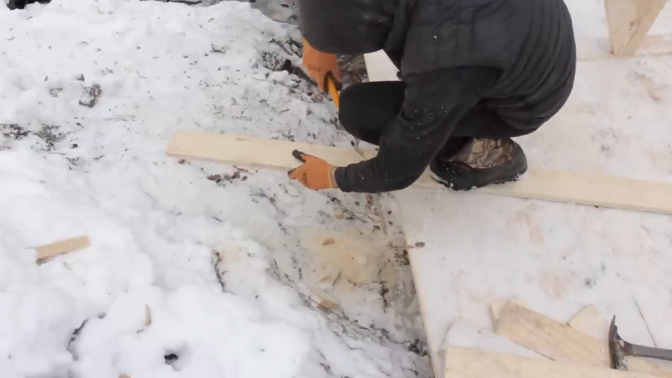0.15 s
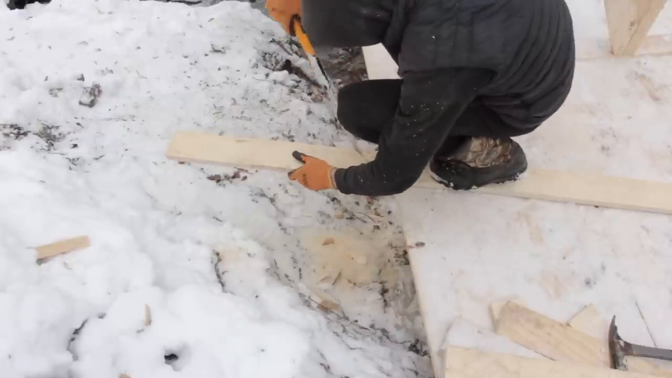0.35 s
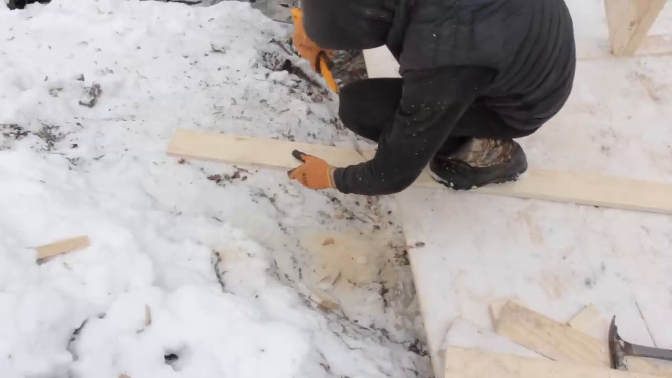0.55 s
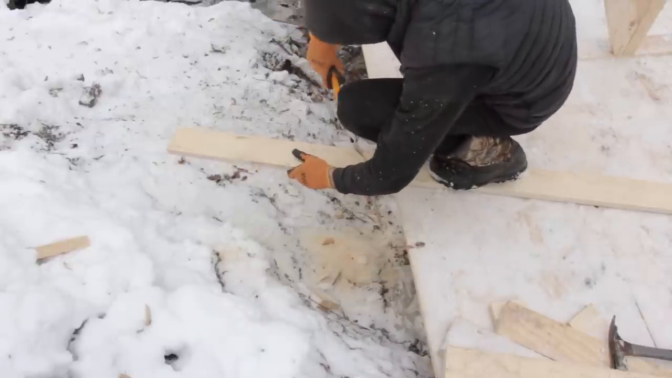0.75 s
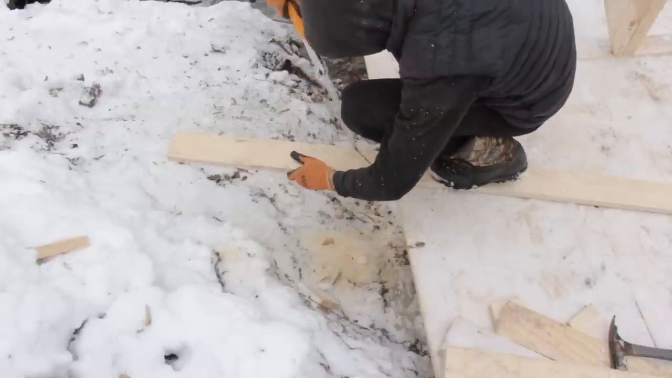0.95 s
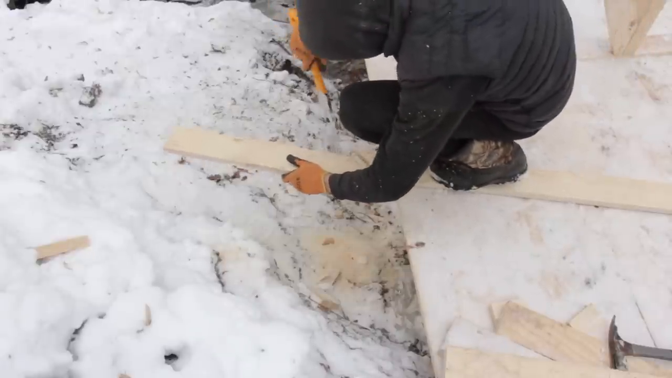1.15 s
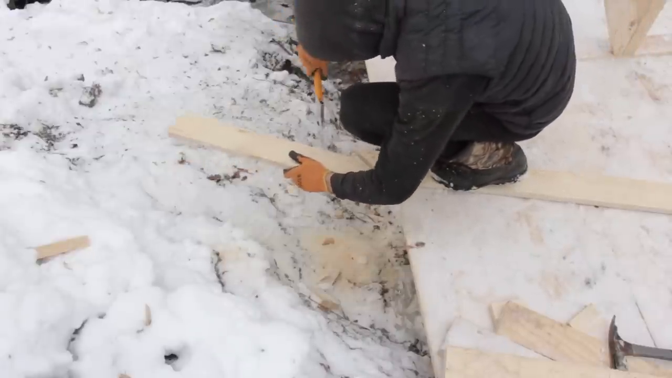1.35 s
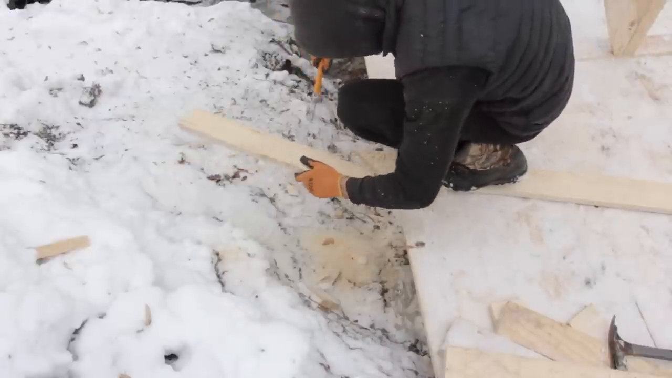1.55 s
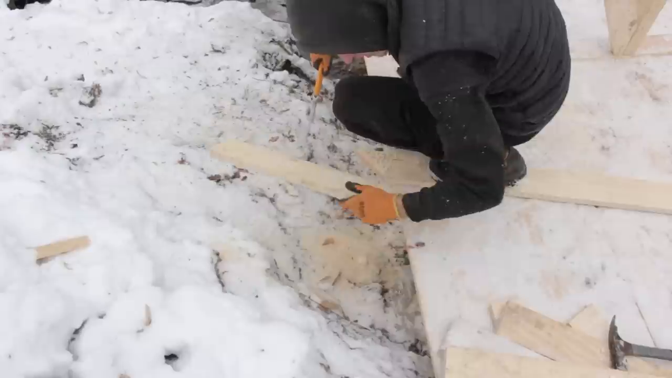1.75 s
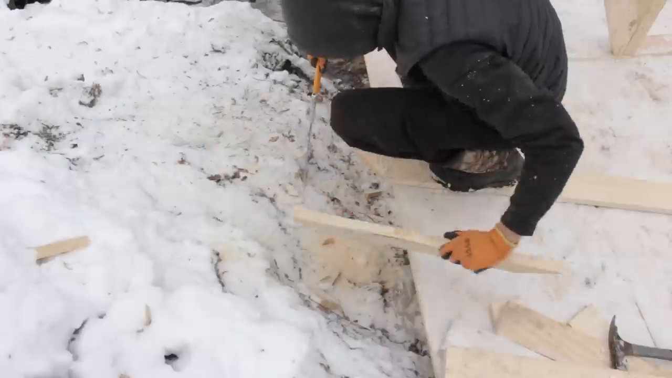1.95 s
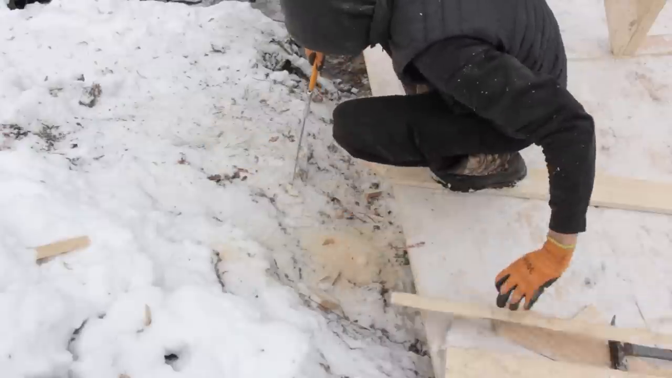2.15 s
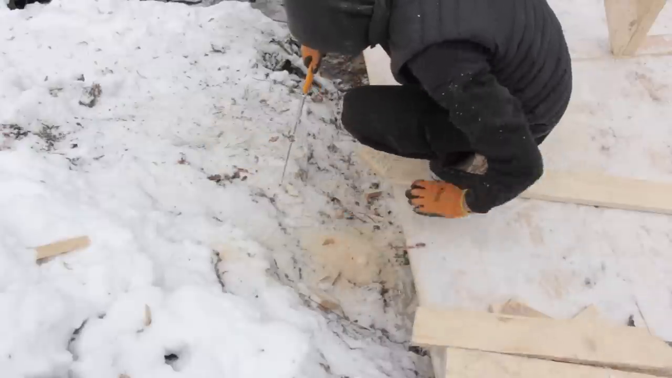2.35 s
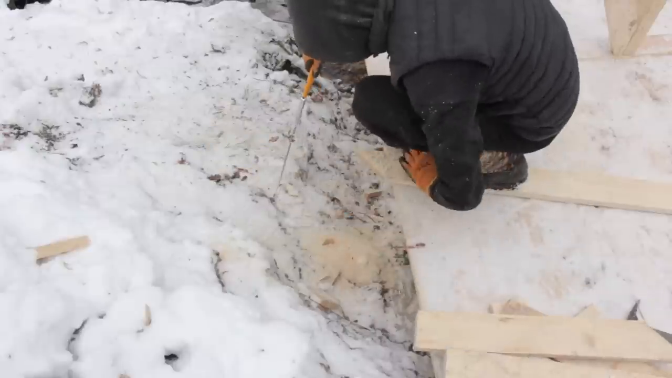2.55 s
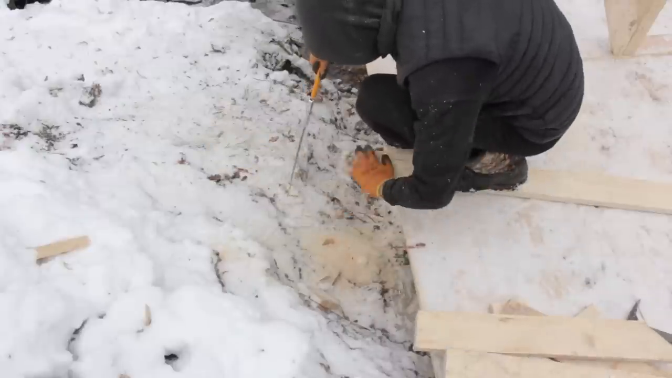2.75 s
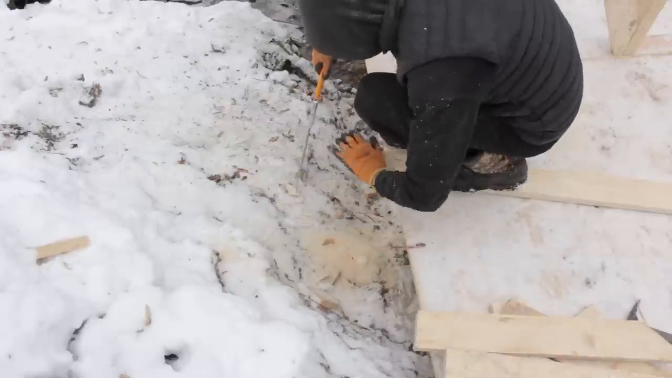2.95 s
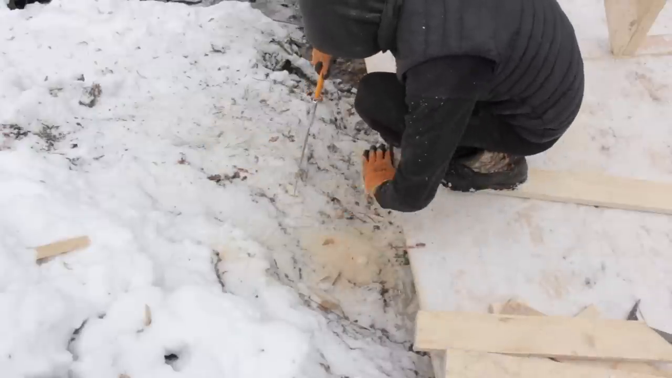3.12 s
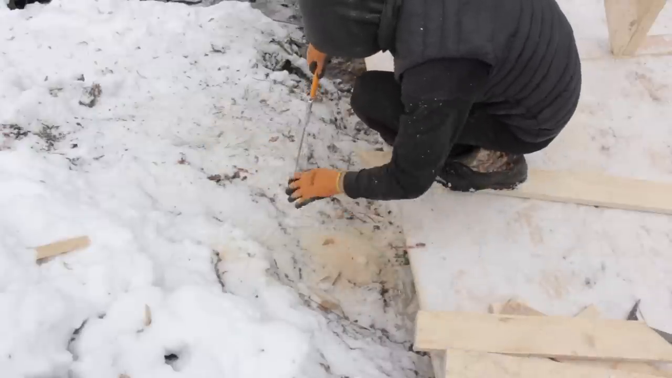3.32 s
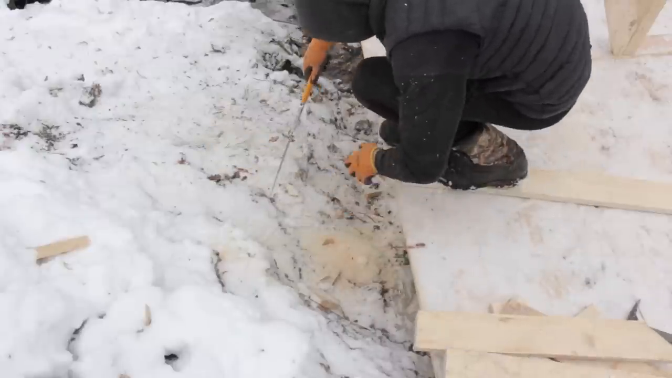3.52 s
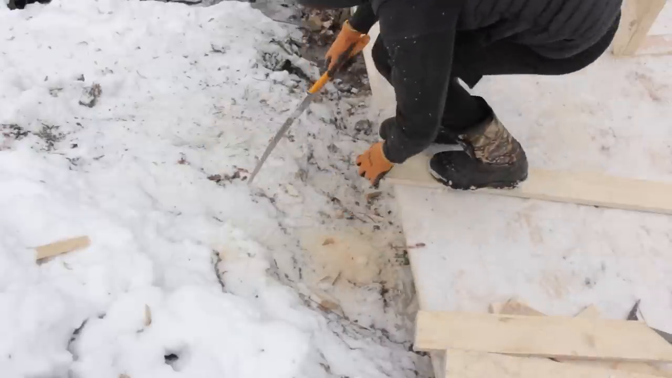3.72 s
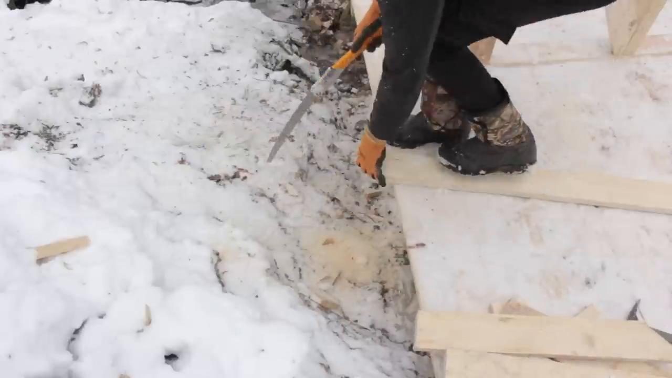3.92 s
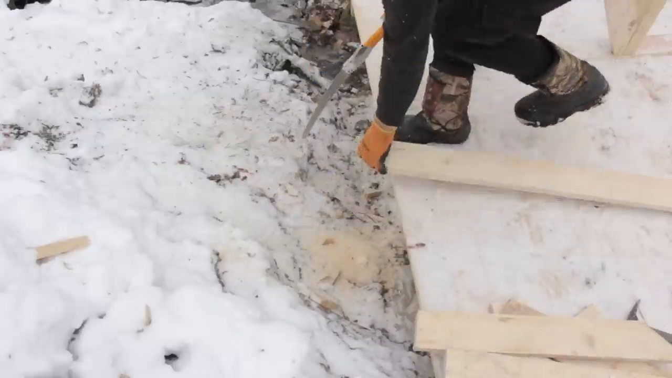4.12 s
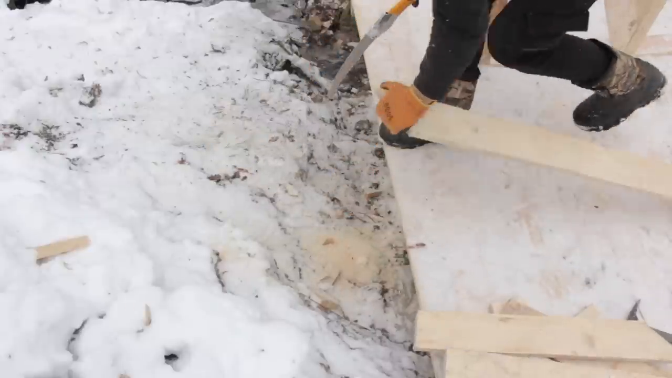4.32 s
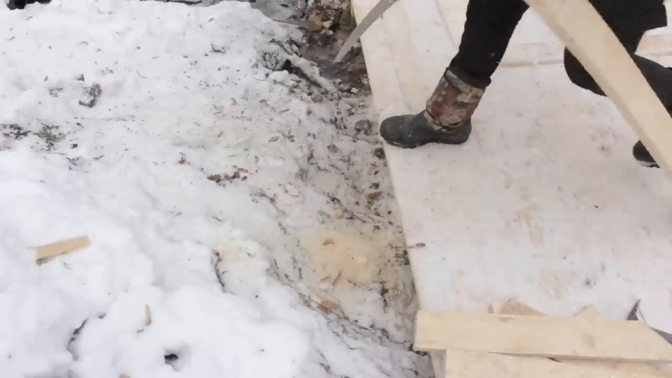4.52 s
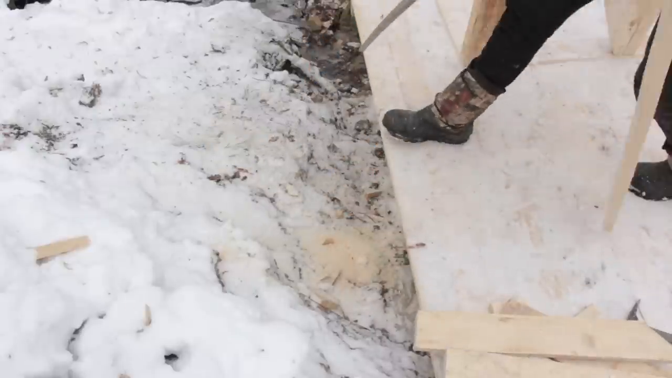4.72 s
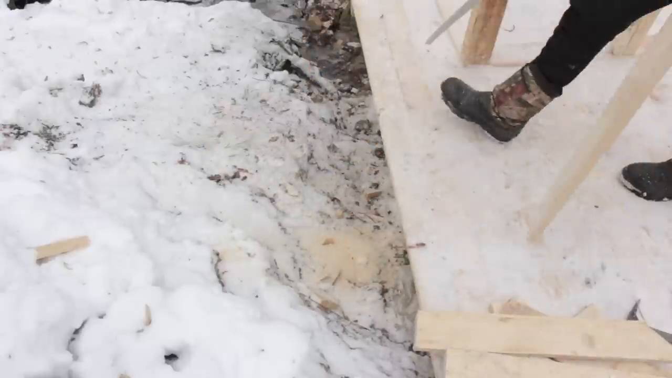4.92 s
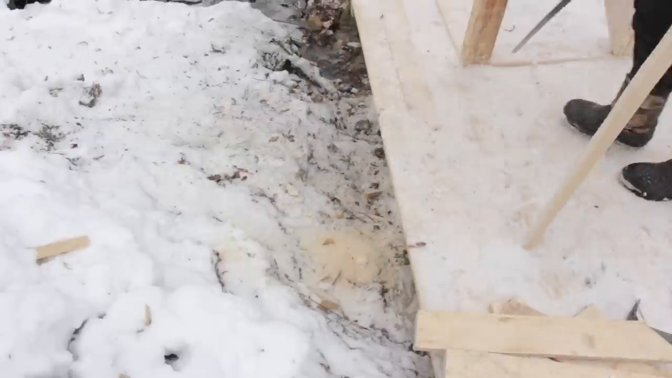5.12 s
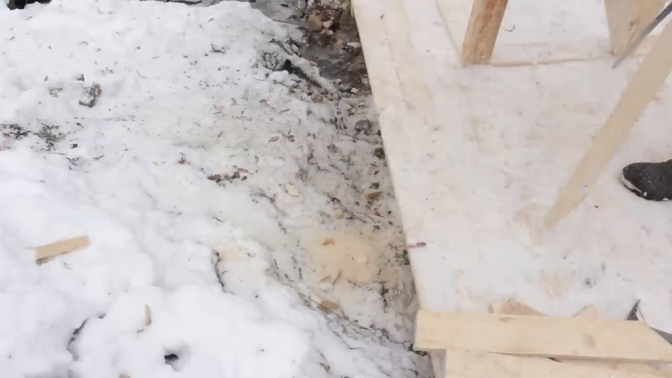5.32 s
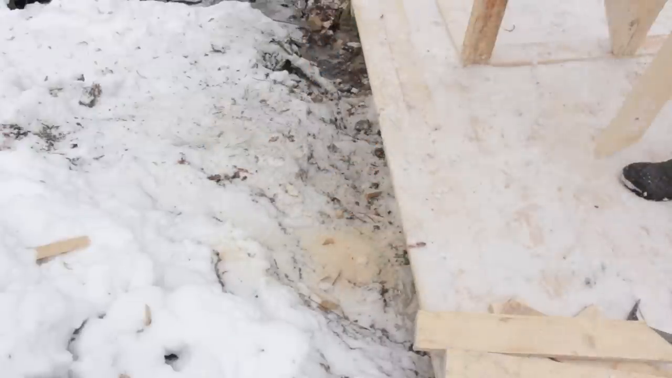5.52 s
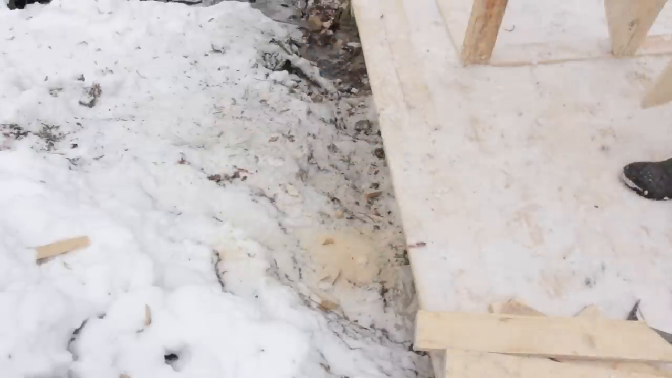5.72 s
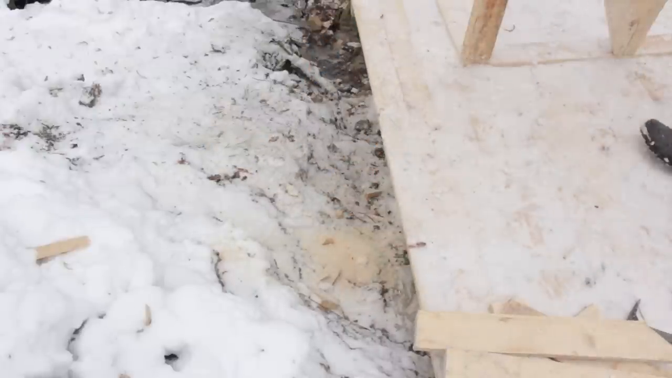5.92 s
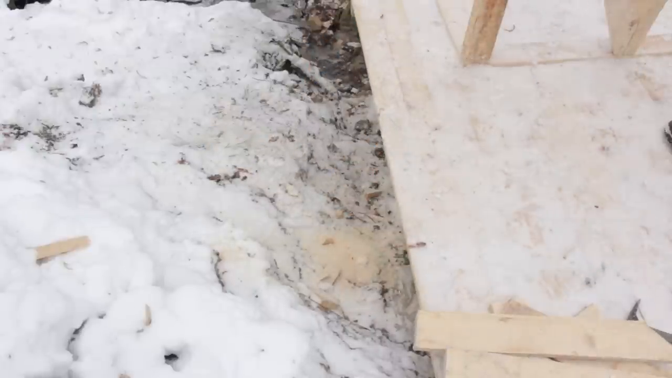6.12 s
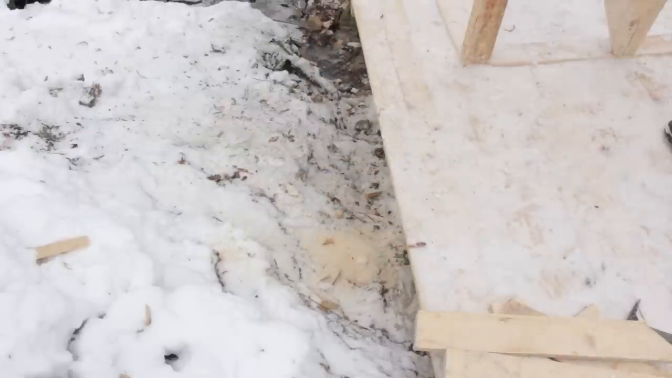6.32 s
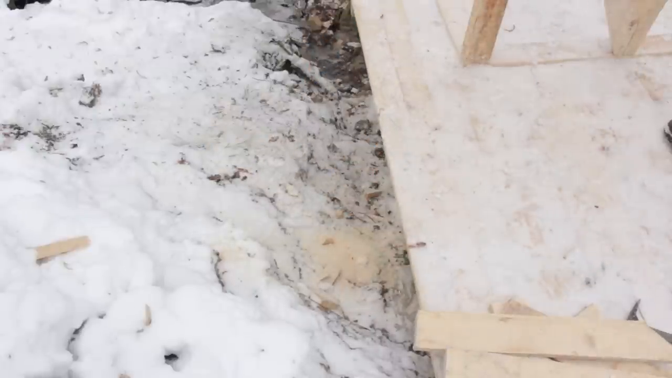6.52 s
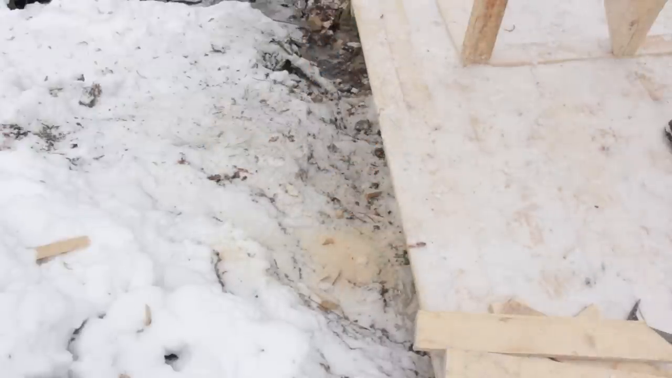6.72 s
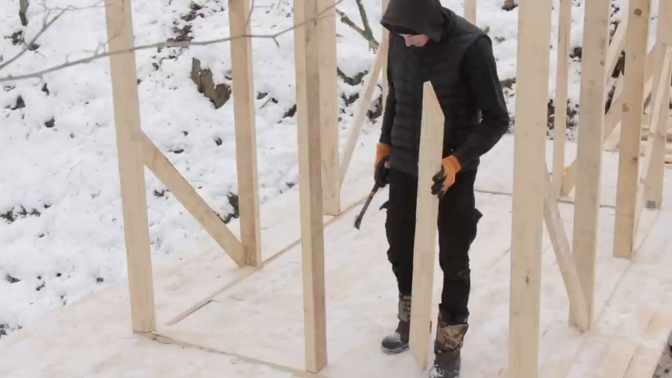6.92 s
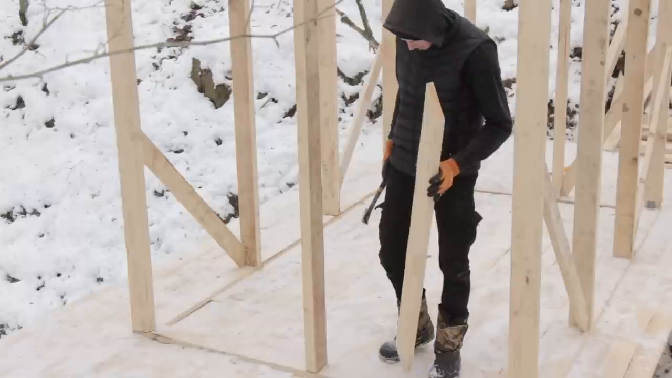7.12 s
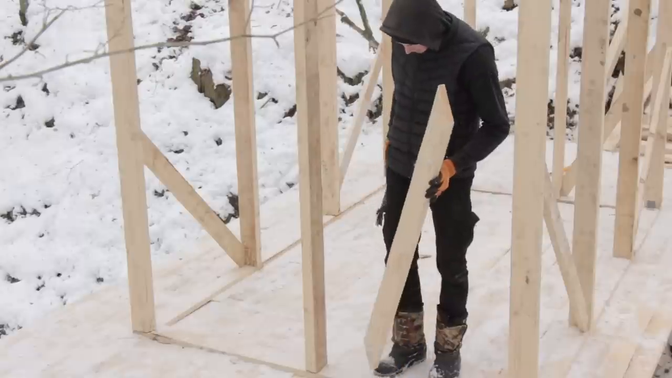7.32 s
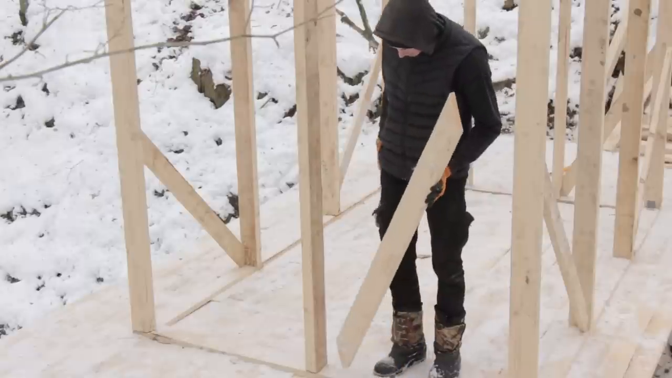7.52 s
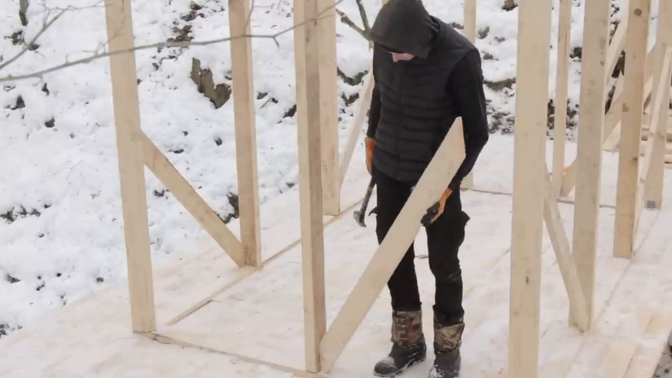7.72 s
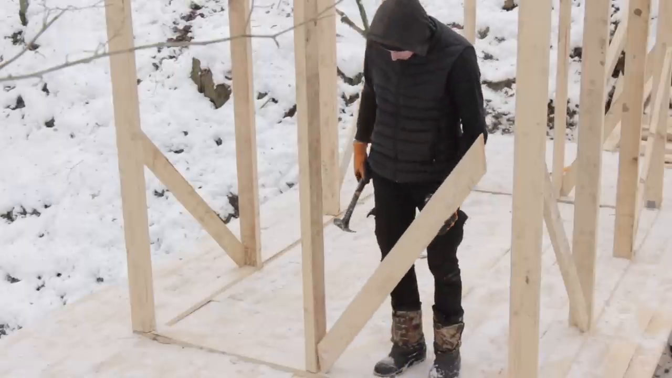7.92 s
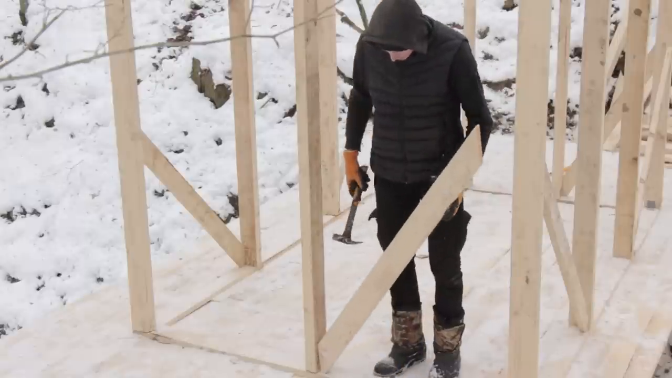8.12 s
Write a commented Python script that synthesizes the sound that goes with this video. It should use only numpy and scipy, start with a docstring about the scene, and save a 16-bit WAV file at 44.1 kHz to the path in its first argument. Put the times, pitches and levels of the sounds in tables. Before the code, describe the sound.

Outdoors beside a steadily rushing stream, a handsaw makes its last few back-and-forth strokes and the wood snaps. A piece of timber lands on other boards with a loud clatter that briefly clips the nearby microphone. Soft glove swishes, a short wooden scrape and scuffing boots follow, then two heavy knocks boom through a plywood deck. The water suddenly sounds farther off, and a board is set down with a soft bump.

```python
"""First you hear a handsaw rasping through a board on a plywood deck, its teeth tearing the fibres.
The offcut splinters, cracks away and clatters onto a pile. The carpenter brushes off snow with his
glove, drags up a board and steps over the deck, which booms under each blow. The loudest knocks
overload the microphone. A stream rushes behind it all; near the end, as the board is set down,
the water turns quieter, as if heard from further off."""
import sys
import numpy as np
from scipy import signal
from scipy.fft import rfft, irfft, next_fast_len
from scipy.io import wavfile
from scipy.ndimage import uniform_filter1d

SR = 44100
rng = np.random.default_rng(int(sys.argv[2]) if len(sys.argv) > 2 else 0)


def int16_out(signal):
    """Quantize to a 16-bit WAV file."""
    q = np.round(np.clip(np.atleast_2d(signal).T, -1, 1) * 32767)
    wavfile.write(sys.argv[1], SR, q.astype(np.int16))


N = 364251
TIME = np.arange(N) / SR
RING_TIME = TIME[:SR]  # one second for a blow to die away

# Pull and push in turn. Each row: start and end in seconds, rasp and hiss in dB at full speed.
SAW_STROKES = [(.022, .27, -26.5, -50), (.262, .52, -23.5, -31), (.485, .775, -34, -44.5),
               (.785, 1.07, -24.5, -32.5)]
# The notes of blade and board. Each row: pitch in Hz, width in Hz, level in dB.
BLADE_NOTES = [(1044, 34, 7), (1500, 55, -8), (1610, 200, -7.5), (2330, 83, -12), (2510, 140, -13.5),
               (3294, 58, -8), (3510, 43, -20), (4180, 120, -10), (4320, 80, -22), (5760, 130, -13.5)]
# The tone of the rasp, the teeth's hiss and the deck's rumble. Each row: frequency in Hz, level in dB.
RASP_TONE = [(150, 1.5), (300, 8), (550, 8.5), (850, -6), (1250, -5), (1800, -4.5), (2900, -15.5),
             (4200, 1.5), (4900, -31), (6500, -39), (8000, -32)]
HISS_TONE = [(4000, 1.5), (6000, -11), (7500, -4.5), (8700, -13), (10000, 0), (10500, -11), (10900, -3),
             (11300, -11), (11700, 0.5), (12600, -13), (15500, -20)]
RUMBLE_TONE = [(40, -19), (66, 0), (79, 9), (90, 9), (107, 3.5), (130, -3), (185, -20), (240, 1.5),
               (310, -32), (400, -8.5), (520, -20), (900, -45)]
THROUGH_S = 1.01  # the blade breaks through


def saw(teeth_per_s=620, jitter=.22, catch_db=3, blade_db=1.54, rasp_db=-3, rumble_db=-38.5):
    """Teeth tear fibres, faster and louder in mid-stroke; blade and board ring, the deck rumbles."""
    rasp_level, hiss_level, speed, position = np.zeros((4, N))
    for k, (start, end, stroke_db, hiss_db) in enumerate(SAW_STROKES):
        arc = np.pi * np.clip((TIME - start) / (end - start), 0, 1)
        pace = np.abs(np.sin(arc))
        rasp_level += undb(stroke_db) * pace ** 3.67
        hiss_level += undb(hiss_db) * pace ** (4.7 if k % 2 else 1.5)  # briefer on the push
        speed += pace
        position += (-1) ** k * (1 - np.cos(arc)) / 2
    teeth_passed = np.floor(np.cumsum(teeth_per_s * speed * np.exp(jitter * wander(200))) / SR)
    teeth = np.diff(teeth_passed, prepend=0) * undb(2.5 * rng.standard_normal(N))
    force = teeth * np.sqrt(SR / teeth_per_s) + .7 * grit(7000, 2)
    force *= undb(catch_db * wander(170))  # the blade catches and frees itself
    force /= np.std(force[:SR])
    # Waves bounce back from the blade's tip, sooner or later as it slides through the cut.
    delay_s = .000382 + .001144 * position
    bounce = np.interp(TIME - delay_s, TIME, force)
    tearing = smear(force + .7 * bounce) / np.hypot(1, .7)
    click = signal.unit_impulse(4096)  # dividing by a filtered click keeps the power
    rasp = colour(tearing, RASP_TONE) / np.linalg.norm(colour(click, RASP_TONE))
    hiss = colour(tearing, HISS_TONE) / np.linalg.norm(colour(click, HISS_TONE))
    cut = rasp_level * (undb(blade_db) * resonate(force, BLADE_NOTES) + undb(rasp_db) * rasp)
    rumble = (undb(rumble_db) + undb(-7) * rasp_level) * noise(RUMBLE_TONE)
    # Once through, the cut fades by 900 dB a second and the rumble by 92.
    since_through = np.maximum(TIME - THROUGH_S, 0)
    return undb(-900 * since_through) * (cut + hiss_level * hiss) + undb(-92 * since_through) * rumble


# The tone of breaking fibres. Each row: frequency in Hz, level in dB.
SPLINTER_TONE = [(600, -12), (2200, -0.5), (3000, -5), (4200, 2), (5200, -9.5), (8000, -15), (15000, -18)]


def splinters(start_s=.85, per_second=280, level_db=-23):
    """The last fibres break as the offcut sags, louder and louder until the blade is through."""
    strain_db = np.interp(TIME, [start_s, THROUGH_S], [-5.5, 0], left=-np.inf, right=-np.inf)
    crunch = unit(colour(smear(grit(per_second, 1)), SPLINTER_TONE))
    return undb(level_db + strain_db) * crunch


# Wood hits wood. Each row: start in seconds, level in dB, favoured pitch in Hz, drop away from
# that pitch in dB per octave, ring time multiplier, deck thud in dB compared with the knock.
WOOD_KNOCKS = [(0.4706, -27, 1010, 8.5, 0.88, -0.5), (0.9453, -15.5, 1100, 4.5, 1.2, -17),
               (.961, -20, 450, 22, 1.63, -9.5), (0.981, -20, 950, 7, 1, -3),
               (2.1777, -3, 740, 8, 0.95, -13.5), (2.2736, -4.5, 787, 50, 1, -10),
               (2.318, -5, 603, 31, 0.61, -17), (2.341, -7, 775, 6.5, 0.51, -14),
               (2.371, -26, 1500, -3, 1.5, -2), (2.424, -20, 695, 3.5, 1.47, -2.5),
               (2.501, -26, 800, 29, .5, -3), (2.541, -25.5, 1280, 40, 1.5, -17),
               (2.556, -12, 540, 9, 0.69, -7), (4.424, -29, 1510, 12, 0.74, -16),
               (4.543, -20.5, 1260, 9.5, 0.48, -13), (4.564, -40.5, 350, 4, .8, 4.5),
               (4.704, -32, 320, 7, 1.1, -3.5), (4.805, -25, 1200, 12.5, 0.73, -28),
               (5.1191, -19, 800, 2, 0.54, -16), (5.1288, -7.5, 915, 5, 0.62, -8),
               (5.16, -16.5, 925, 8.5, 0.82, -9), (5.182, -27.5, 1000, 4, .4, -14),
               (6.4596, -20.5, 1380, 14, .3, -5), (6.468, -12.5, 1430, 7, .94, -19),
               (6.508, -35, 885, 5, 1.5, -9), (7.827, -31.5, 350, 12, 2.1, 1),
               (7.871, -33.5, 390, -0.5, 1.3, 2)]
# The notes of the timber. Each row: pitch in Hz, level in dB, base ring time in seconds.
TIMBER_NOTES = [(213, -16, 0.51), (362, -2, 0.07), (460, -4, 0.032), (552, -3, 0.072), (627, -4, 0.11),
                (694, -12, 0.12), (805.4, -7.5, 0.1), (905.6, -7, 0.093), (1013, -4, 0.052),
                (1238, -2.5, 0.056), (1338, -10.5, 0.088), (1570, -8.5, 0.088), (1811, -5, 0.09),
                (1940, -15, 0.049), (2510, -21, 0.17)]
# The tone of clattering boards. Each row: frequency in Hz, level in dB.
CLATTER_TONE = [(60, -20), (200, 10.5), (500, 5.5), (1000, 1), (1500, -1.5), (2000, -19), (2250, -10),
                (4000, -10), (6000, -12.5), (8500, -21), (11000, -16), (15500, -33)]


def knocks(clatter_db=-2.5, timber_db=-1.2, clatter_s=.12, hardness=8):
    """Each blow rings the timber around one pitch, set by where it lands, and shakes the deck."""
    out = np.zeros(N)
    for start, db, hz, drop_db, stretch, deck_db in WOOD_KNOCKS:
        def favour_db(frequency):
            return -drop_db * np.abs(np.log2(frequency / hz))
        weights_db = favour_db(np.array(TIMBER_NOTES)[:, :1])
        timber = struck_notes(TIMBER_NOTES, weights_db, stretch, detune=.011)
        tone = [(f, level + max(favour_db(f), -26)) for f, level in CLATTER_TONE]
        clatter = dense_ring(tone, clatter_s * stretch, damping=.31)
        wood = soften(undb(timber_db) * timber + undb(clatter_db) * clatter, hardness * hz)
        add(out, start, undb(db) * (wood + deck(deck_db, swing_db=deck_db - 17)))
    return out


# Boots, hands and timber land. Each row: start in seconds, thud in dB, floor swing in dB.
DECK_THUDS = [(.425, -27, -29.5), (1.081, -35.5, -39), (2.175, -8, -37), (2.425, -29, -33),
              (2.5542, -19, -48), (2.82, -46, -39.5), (3.183, -34, -43), (3.225, -40, -43.5),
              (3.635, -44, -59), (4.971, -44, -48), (5.1205, -11, -17.5), (6.448, -8, -28.5),
              (6.802, -37, -57), (7.513, -56, -76), (7.881, -36, -37)]


def thuds(rattle_db=-15, rattle_s=.085, rattle_hz=1500):
    """Heavy, soft blows on the deck, each with a dull rattle of the boards."""
    out = np.zeros(N)
    for start, db, swing_db in DECK_THUDS:
        rattle = soften(dense_ring(CLATTER_TONE, rattle_s, damping=.38), rattle_hz)
        add(out, start, deck(db, swing_db) + undb(db + rattle_db) * rattle)
    return out


# The notes of the plywood and of the whole floor on its beams.
# Each row: pitch in Hz, level in dB, base ring time in seconds.
PLYWOOD_NOTES = [(101, -15, 0.13), (113, -7.5, 0.21), (153, 8.5, .11), (166.5, 2, 0.14), (183.8, 2, 0.15),
                 (237.5, -6, 0.076), (390.5, -5, 0.059)]
FLOOR_NOTES = [(53.6, -10, 1), (77.5, 6, 0.78), (91.1, -11, 0.75), (100.4, -2, 0.96)]
# The tone of the deck's boom. Each row: frequency in Hz, level in dB.
BOOM_TONE = [(25, -16), (50, -29), (80, 0), (150, -9), (250, -11), (450, -2), (900, -43)]


def deck(thud_db, swing_db, boom_db=-6, boom_s=.078, cutoff_hz=480):
    """The plywood thuds under a blow and the whole floor swings on after it."""
    plywood = struck_notes(PLYWOOD_NOTES, 0, stretch=.72, detune=.014)
    boom = undb(boom_db) * dense_ring(BOOM_TONE, boom_s, damping=.78)
    swing = struck_notes(FLOOR_NOTES, 0, stretch=.98, detune=.0065)
    return undb(thud_db) * soften(plywood + boom, cutoff_hz) + undb(swing_db) * swing


# Cracks and taps. Each row: start in seconds, level in dB, pitch in Hz, width in octaves,
# length in seconds.
WOOD_SNAPS = [(1.003, -18.5, 2060, 1.5, 0.0049), (1.081, -33, 2000, 1.8, 0.0074),
              (1.087, -44, 10700, 0.25, 0.012), (2.179, -16, 5860, 0.47, 0.004),
              (2.54, -28, 4230, .87, 0.0039), (3.973, -28.5, 3830, 0.94, .0069),
              (4.803, -24.5, 3430, 0.94, 0.0041), (5.901, -33.5, 1700, 1.3, 0.0099),
              (6.033, -34.5, 3350, 0.53, 0.02), (7.825, -38, 1490, 1.35, 0.016)]


def snaps():
    """Sharp cracks and small taps, each a tiny burst of noise."""
    return bursts(WOOD_SNAPS)


# Brushing movements. Each row: loudest moment, rise time and fade time in seconds, level in dB.
BRUSH_MOVES = [(2.835, 0.09, 0.045, -32), (3.185, 0.024, 0.029, -36), (3.24, 0.043, 0.038, -33.5),
               (4.714, 0.015, .042, -29), (4.97, 0.034, 0.044, -37), (5.84, 0.049, .06, -46),
               (6.128, 0.013, 0.021, -31.5), (7.39, 0.083, 0.072, -43)]
# The tone of rubbing cloth. Each row: frequency in Hz, level in dB.
CLOTH_TONE = [(60, -45), (130, -2.5), (280, -12), (600, -0.5), (1100, 0.5), (1700, 5), (2400, -2.5),
              (4500, -5), (8000, -14.5), (11000, -14.5), (15500, -30)]


def brushing():
    """Glove, clothes and soles rub in soft swells, thousands of tiny clicks blurring into a swish."""
    friction = grit(9000, 1.5) * undb(1.2 * wander(200))
    return swells(BRUSH_MOVES) * unit(colour(friction, CLOTH_TONE))


# The notes of the long board. Each row: pitch in Hz, width in Hz, level in dB.
BOARD_NOTES = [(860, 20, -1), (1040, 17, -17), (1148, 16, 10.5), (1380, 21, -15), (1500, 27, 7.5),
               (1630, 30, -15), (1930, 49, -9), (2296, 53, -0.5), (2700, 47, -6), (3020, 60, -7)]
# The tone of its scrape. Each row: frequency in Hz, level in dB.
SCRAPE_TONE = [(50, -34), (110, 1), (300, -38), (600, -17), (1100, -2.5), (1850, 8), (2150, -12),
               (2700, -2.5), (4500, -13), (12000, -37)]


def board_drag(start_s=4.347, fastest_s=4.474, stop_s=4.555, force_db=-16.5, ring_db=-6, scrape_db=-3):
    """The board's end sticks and slips along the plywood, which scrapes and makes the board ring."""
    slips = unit(smear(grit(1800, 1)) * undb(2.2 * wander(260)))
    swell_db = np.interp(TIME, [start_s, fastest_s, stop_s], [-26.5, 0, -13], left=-np.inf, right=-np.inf)
    force = slips * undb(force_db + swell_db)
    scrape = colour(force, SCRAPE_TONE) / np.std(colour(slips, SCRAPE_TONE))
    return undb(ring_db) * resonate(force, BOARD_NOTES) + undb(scrape_db) * scrape


# Boots shifting. Each row: loudest moment, rise time and fade time in seconds, level in dB.
BOOT_MOVES = [(3.9, 0.43, .8, -52), (4.92, 0.21, 0.19, -42.5), (5.72, 0.45, 0.56, -49.5)]
# The tone of crunching grit. Each row: frequency in Hz, level in dB.
GRIT_TONE = [(200, 3), (1000, 1), (2000, -3), (5000, -4.5), (8000, -12.5), (15000, -22)]


def boot_scuffs():
    """Grit crackles under shifting boots."""
    return swells(BOOT_MOVES) * unit(colour(smear(grit(350, 1)), GRIT_TONE))


# The tone of the stream from near and from far. Each row: frequency in Hz, level in dB.
NEAR_WATER_TONE = [(18, -49), (30, -14), (66, -15), (102, -9), (230, -9), (307, -11.5), (532, 1),
                   (787, 0.5), (1910, 1.5), (2360, -8.5), (4190, -4.5), (5890, -8), (8060, -22),
                   (9430, -18), (15500, -33.5)]
FAR_WATER_TONE = [(18, -52), (30, -22), (69, -18), (102, -19), (164, -3.5), (243, -2.5), (455, 0.5),
                  (921, 1), (1050, 0.5), (1720, 0.5), (2690, -5), (6050, -8.5), (8500, -22.5), (11000, -20),
                  (15500, -34)]


def stream(near_db=-40, far_db=-50.5, far_from_s=6.895, flicker_db=2):
    """An even rush of water whose low bands gurgle each in their own time, quieter from far off."""
    def rush(tone):
        water = noise(tone)
        for hz in (250, 500, 1000, 2000):
            octave = signal.butter(1, [hz / np.sqrt(2), hz * np.sqrt(2)], "band", fs=SR, output="sos")
            flicker = undb(flicker_db * np.tanh(wander(35)))
            water = water + signal.sosfilt(octave, water) * (flicker - 1)
        return unit(water)
    near = undb(near_db) * rush(NEAR_WATER_TONE)
    far = undb(far_db) * rush(FAR_WATER_TONE)
    return np.where(TIME < far_from_s, near, far)


# The clearest gurgles. Each row: start in seconds, level in dB, pitch in Hz.
WATER_GURGLES = [(3.522, -38, 758), (4.276, -35.5, 970), (4.92, -38, 860), (6.356, -38.5, 630),
                 (6.409, -38.5, 636)]


def gurgles(width_octaves=.22, length_s=.014):
    """Brief hollow notes from the water."""
    return bursts([(start, db, hz, width_octaves, length_s) for start, db, hz in WATER_GURGLES])


def echo(sound, fade_s=.33, delay_s=.012):
    """The timber frame and the slope scatter the sound back a moment later."""
    tail = colour(rng.standard_normal(SR), [(60, -5.5), (1500, -2), (12000, -4)])
    tail *= undb(-60 * RING_TIME / fade_s) * (RING_TIME > delay_s)
    return signal.fftconvolve(sound, tail / np.linalg.norm(tail))[:N]


def struck_notes(table, weights_db, stretch, detune):
    """A struck body rings, a little off pitch each time; notes fall 60 dB in ring time * stretch."""
    hz, db, ring_s = np.transpose(table)[:, :, None]
    hz = hz * (1 + detune * rng.standard_normal(hz.shape))
    sign = (-1) ** np.arange(len(hz))[:, None]
    fade = undb(db + weights_db - 60 * RING_TIME / (ring_s * stretch))
    return attack_unit(np.sum(sign * fade * np.sin(2 * np.pi * hz * RING_TIME), axis=0))


def dense_ring(tone, ring_s, damping):
    """Countless notes blur into noise that falls 60 dB in ring_s at 1000 Hz, and sooner higher up."""
    spectrum = rfft(colour(rng.standard_normal(SR), tone))
    out = 0
    for hz in 1000 * 2. ** np.arange(-5, 5):
        band = irfft(spectrum * np.maximum(1 - np.abs(octaves(SR, hz)), 0), SR)
        band_s = ring_s * (hz / 1000) ** -damping
        out = out + band * undb(-60 * RING_TIME / band_s)
    return attack_unit(out)


def resonate(force, table):
    """A force keeps a body's notes ringing; narrow notes ring longest."""
    ring = sum(undb(db) * width * np.exp(-np.pi * width * RING_TIME) * np.sin(2 * np.pi * hz * RING_TIME)
               for hz, width, db in table)
    return signal.fftconvolve(force, ring / np.linalg.norm(ring))[:N]


def bursts(table):
    """Short puffs of noise, each around its own pitch."""
    out = np.zeros(N)
    for start, db, hz, width, length_s in table:
        burst = irfft(rfft(rng.standard_normal(SR)) / (1 + (octaves(SR, hz) / width) ** 2) ** 2, SR)
        age = 2 * RING_TIME / length_s  # loudest at age 1
        add(out, start, undb(db) * unit(burst) * age * np.exp(1 - age))
    return out


def swells(table):
    """The level of a set of soft movements, each rising and fading."""
    return sum(undb(db) * np.sin(np.pi / 2 * np.interp(TIME - peak, [-rise, 0, fade], [0, 1, 0]))
               for peak, rise, fade, db in table)


def soften(x, hz):
    """A soft contact dulls a blow above hz."""
    return signal.sosfilt(signal.butter(2, min(hz, 18000), fs=SR, output="sos"), x)


def smear(clicks):
    """Wood spreads every click over a few milliseconds without changing its tone."""
    tail = rng.standard_normal(SR) * np.exp(-RING_TIME / .0012)
    even_tail = irfft(np.exp(1j * np.angle(rfft(tail))), SR)[:512]
    return signal.fftconvolve(clicks, even_tail)[:N]


def grit(per_second, spread_db):
    """Tiny clicks at random times with uneven sizes."""
    clicks = (rng.random(N) < per_second / SR) * rng.standard_normal(N)
    return unit(clicks * undb(spread_db * rng.standard_normal(N)))


def wander(per_second):
    """A value that glides between random points, mostly within -1 to 1."""
    step = int(SR / per_second)
    return uniform_filter1d(np.repeat(rng.standard_normal(N // step + 1), step), step)[:N]


def noise(tone):
    """Steady noise with the given tone."""
    return unit(colour(rng.standard_normal(next_fast_len(N)), tone)[:N])


def colour(x, tone):
    """Filter by a tone table, falling 20 dB an octave beyond its ends."""
    hz, db = np.transpose(tone)
    bins, points = octaves(len(x), 1), np.log2(hz)
    outside = np.abs(bins - np.clip(bins, points[0], points[-1]))
    return irfft(rfft(x) * undb(np.interp(bins, points, db) - 20 * outside), len(x))


def octaves(n, hz):
    """How many octaves above hz each frequency of an n-sample sound lies."""
    return np.log2(np.maximum(np.fft.rfftfreq(n, 1 / SR), 1) / hz)


def undb(db):
    """Turn decibels into a multiplier."""
    return 10 ** (np.asarray(db) / 20)


def unit(x):
    """Scale to an average (rms) level of 1."""
    return x / np.sqrt(np.mean(x ** 2))


def attack_unit(x):
    """Scale a blow to an average level of 1 over its first 10 milliseconds."""
    return x / np.sqrt(np.mean(x[:441] ** 2))


def add(track, start_s, x):
    """Mix x into the track at start_s."""
    i = max(int(start_s * SR), 0)
    track[i:i + len(x)] += x[:N - i]


def scene(echo_db=-27):
    """The work on the deck and its faint echo, over the stream, in mono."""
    work = saw() + splinters() + knocks() + thuds() + snaps() + brushing() + board_drag() + boot_scuffs()
    return (work + undb(echo_db) * echo(work) + stream() + gurgles())[None]


def record(dry, ceiling=.315, top_hz=15800):
    """The microphone clips the loud blows flat, and the highest treble is cut."""
    double_rate = signal.resample_poly(dry, 2, 1, axis=1)
    clipped = signal.resample_poly(np.clip(double_rate, -ceiling, ceiling), 1, 2, axis=1)
    return signal.sosfiltfilt(signal.ellip(10, .05, 60, top_hz, fs=SR, output="sos"), clipped)


dry = scene()
out = record(dry)
int16_out(out)
```